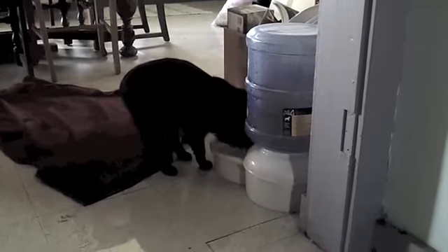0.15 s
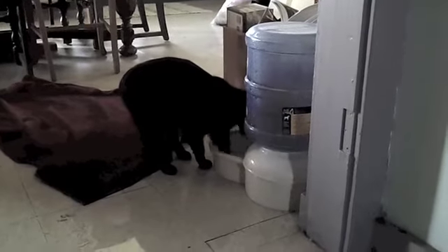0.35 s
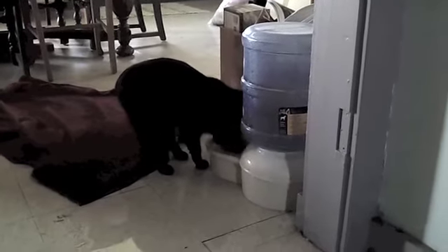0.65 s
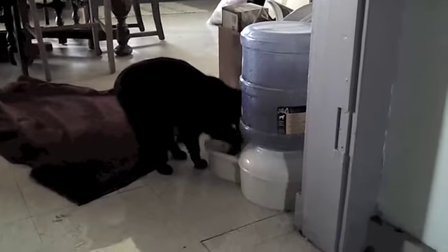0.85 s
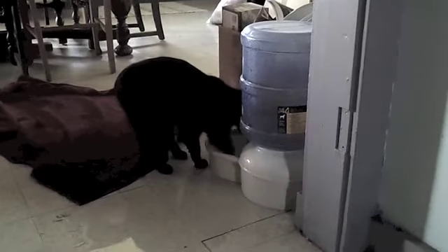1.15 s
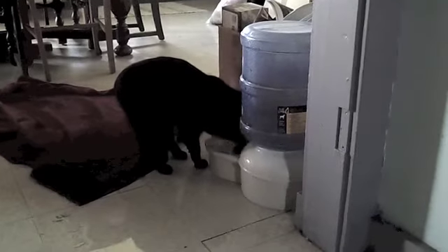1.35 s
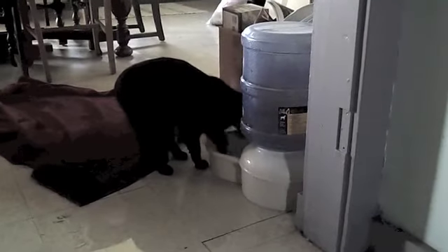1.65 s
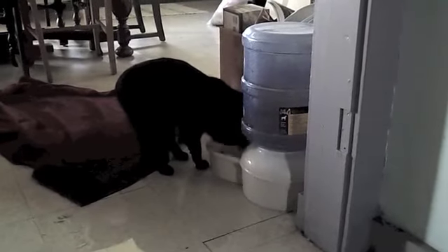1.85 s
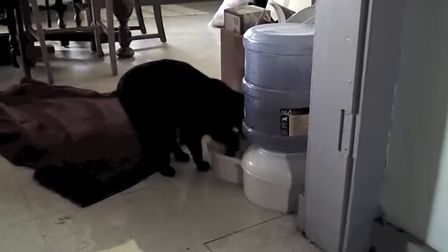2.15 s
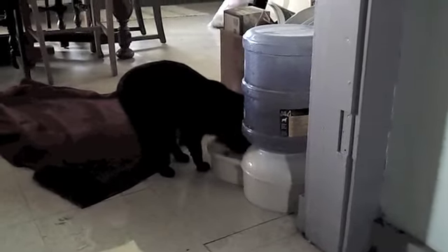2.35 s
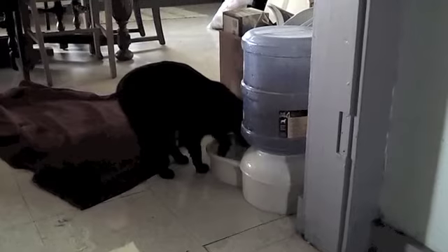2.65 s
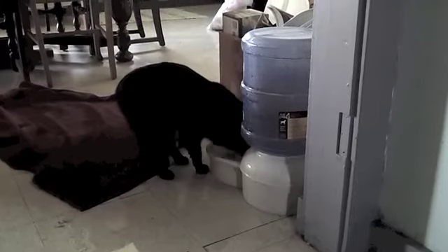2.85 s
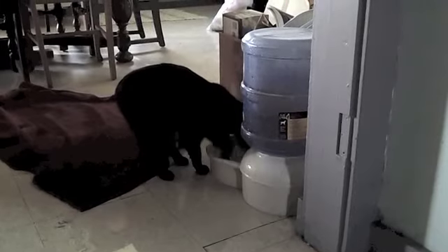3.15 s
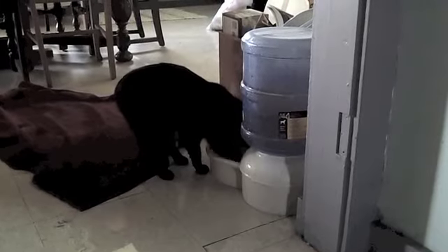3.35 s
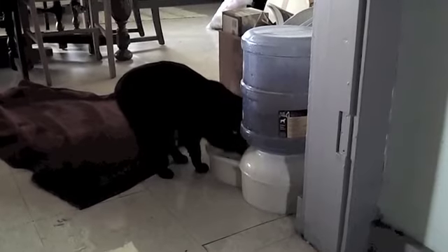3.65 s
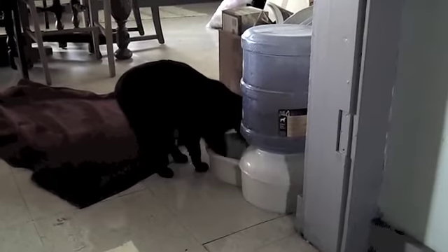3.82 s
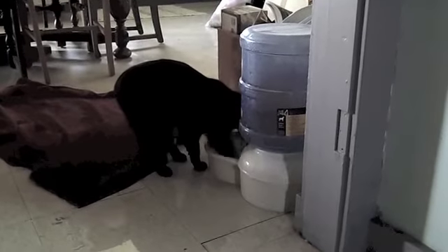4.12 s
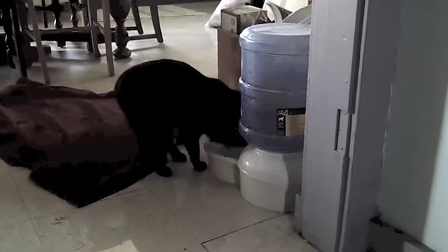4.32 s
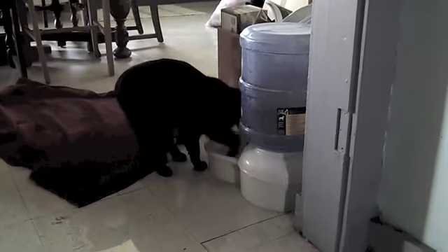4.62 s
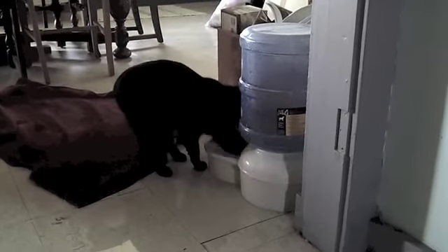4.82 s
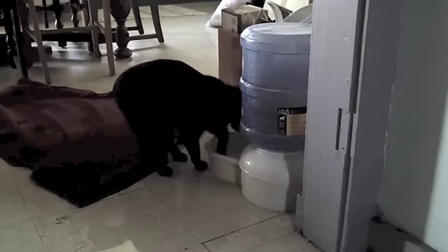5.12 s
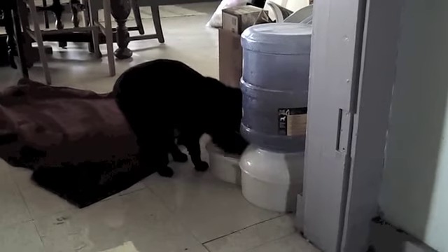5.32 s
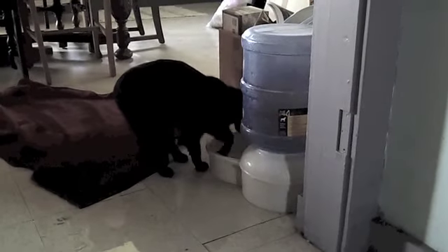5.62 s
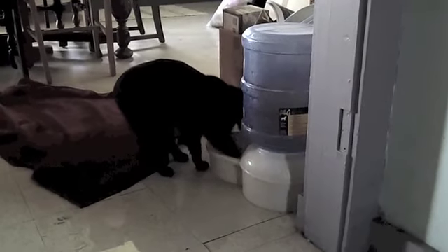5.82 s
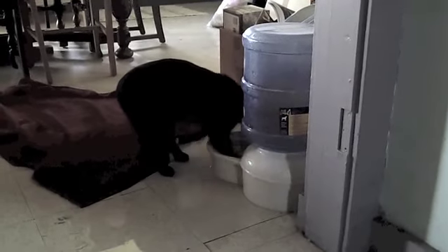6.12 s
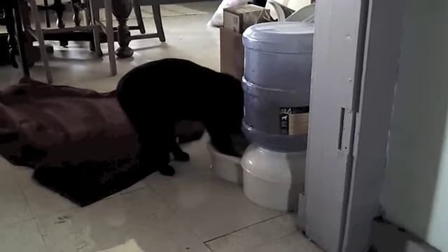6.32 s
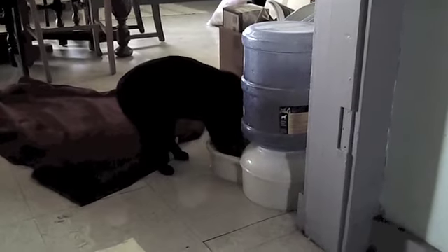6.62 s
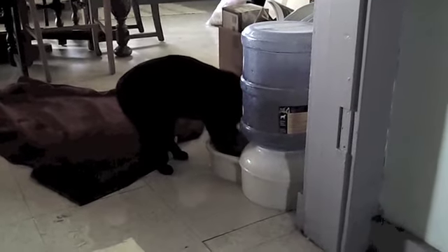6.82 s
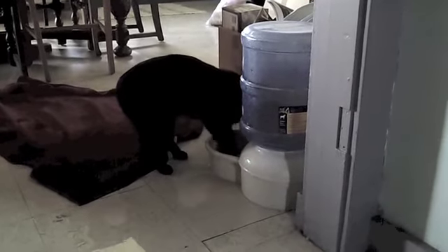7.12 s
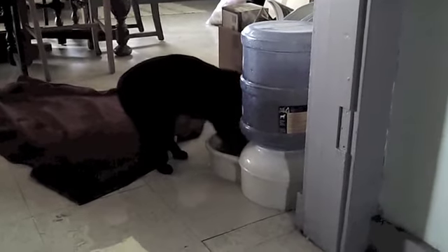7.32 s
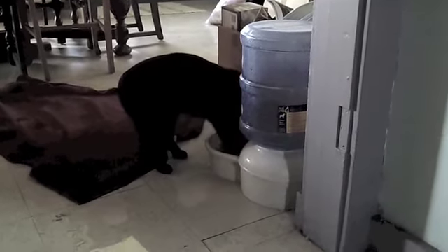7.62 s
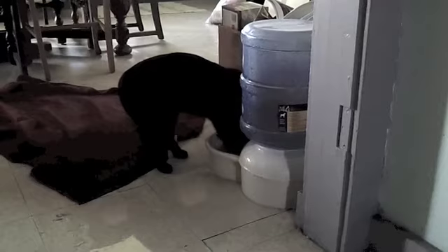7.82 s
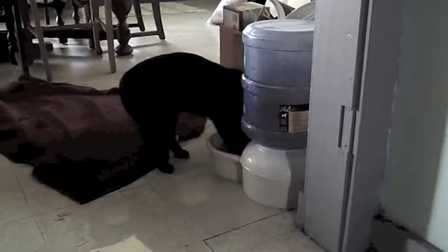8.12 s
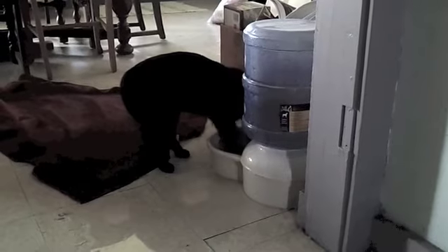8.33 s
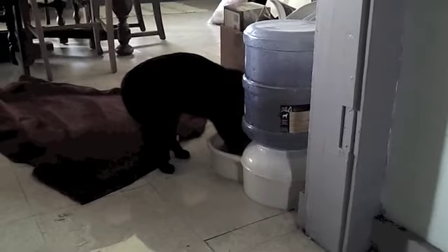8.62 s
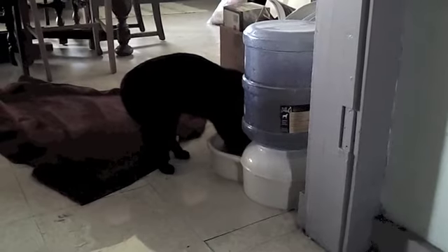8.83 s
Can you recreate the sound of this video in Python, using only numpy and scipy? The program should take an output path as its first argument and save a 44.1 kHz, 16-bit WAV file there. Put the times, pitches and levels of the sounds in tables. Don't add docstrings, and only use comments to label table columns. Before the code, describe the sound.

A cat's paw scoops water in a plastic bowl, with irregular plops, ticking drips and small splashes, then a short scrape across the kitchen floor.

```python
import sys
import numpy as np
from scipy import signal
from scipy.fft import rfft, irfft
from scipy.io import wavfile

SR = 44100
rng = np.random.default_rng(int(sys.argv[2]) if len(sys.argv) > 2 else 0)


def wrap_up_sound(samples):
    columns = np.atleast_2d(samples).T
    tamed = np.clip(columns, -1, 1)
    steps = np.round(tamed * 32767).astype(np.int16)
    wavfile.write(sys.argv[1], SR, steps)


def volts_from_db(level):
    exponent = np.asarray(level, float) / 20
    return 10 ** exponent


N = 395559


def in_time(spans):
    rows = []
    for span in spans:
        silent = [-110] * (len(span[0]) - 1)
        rows.append([span[0][0] - 0.02] + silent)
        rows.extend(span)
        rows.append([span[-1][0] + 0.02] + silent)
    rows = np.array(rows)
    return [np.interp(np.arange(N) / SR, rows[:, 0], column) for column in rows[:, 1:].T]


def rms_one(x):
    return x / np.sqrt(np.mean(x ** 2) + 1e-20)


def band(x, low_hz, high_hz):
    return signal.sosfilt(signal.butter(2, [low_hz, high_hz], "band", fs=SR, output="sos"), x)


def resonate(x, modes):
    out = 0
    for k, (hz, width_hz, db) in enumerate(modes):
        radius = np.exp(-np.pi * max(width_hz, 8) / SR)
        gain = (-1) ** k * volts_from_db(db) * (1 - radius ** 2) / 2
        poles = [1, -2 * radius * np.cos(2 * np.pi * hz / SR), radius ** 2]
        out = out + signal.lfilter([gain, 0, -gain], poles, x)
    return out


def add(out, start_s, sound):
    i = int(start_s * SR)
    out[i:i + len(sound)] += sound[:N - i]


def bubble(db, hz, t60_s, rise, attack_cycles):
    t = np.arange(int(t60_s * SR) + 64) / SR
    swell = 1 - np.exp(-t * hz / attack_cycles)
    cycles = hz * (t + rise * t * t / t60_s)
    return volts_from_db(db - 60 * t / t60_s) * swell * np.sin(2 * np.pi * cycles)


def camera():
    # (frequency [Hz], density [dB per Hz])
    hiss_curve = [(15, -42), (25, -22), (91, -3.5), (179, -2), (392, -5.5), (448, -6.5), (812, -13.5),
                  (954, -12.5), (1590, -16.5), (2260, -16.5), (2730, -28.5), (3880, -13), (4320, -41),
                  (6660, -20), (15800, -22.5)]
    t = np.arange(N) / SR
    bin_hz = np.arange(N // 2 + 1) * SR / N + 1
    curve_hz, curve_db = np.transpose(hiss_curve)
    colour = volts_from_db(np.interp(np.log(bin_hz), np.log(curve_hz), curve_db))
    hiss = volts_from_db(-61) * rms_one(irfft(rfft(rng.standard_normal(N)) * colour, N))

    throb_hz, whine_hz = 29.97, 15371.5
    cycle = t * throb_hz % 1
    gate = np.clip(cycle / 0.024, 0, 1) * volts_from_db(-14 * cycle)
    buzz = volts_from_db(-62.5) * gate * rms_one(band(rng.standard_normal(N), 2780, 4930))
    whine = volts_from_db(-77) * np.sin(2 * np.pi * whine_hz * t)
    return hiss + buzz + whine


def grains(per_s, low_hz, high_hz, cycles, spread_db):
    sizes = volts_from_db(spread_db * np.minimum(rng.exponential(1, N), 4)) * rng.choice([-1, 1], N)
    clicks = sizes * (rng.random(N) < per_s / SR)
    dealt = rng.integers(0, 16, N)
    out = np.zeros(N)
    for k, hz in enumerate(np.geomspace(low_hz, high_hz, 16)):
        out += resonate(clicks * (dealt == k) + 1e-18, [(hz, 2.1 * hz / cycles, 0)])
    return rms_one(out)


def wash():
    # (time [s], gurgle level [dB], spray level [dB])
    runoff = [
        [(0.0, -61, -60.5), (0.15, -49, -59.5), (0.23, -64, -62), (0.35, -57.5, -56), (0.5, -67.5, -64),
         (0.62, -50, -62), (0.74, -69.5, -57), (0.83, -56.5, -58), (1.18, -65, -68), (1.33, -66, -61),
         (1.45, -56, -56.5), (1.51, -61.5, -68), (1.82, -58.5, -57), (1.94, -57, -60.5), (2.07, -66, -55.5),
         (2.17, -58.5, -64), (2.29, -49, -64), (2.54, -70, -71), (2.63, -52, -72), (2.73, -50, -60),
         (2.83, -67, -70), (2.98, -64.5, -53.5), (3.17, -63, -73), (3.25, -56, -56), (3.42, -68, -71),
         (3.52, -51.5, -66), (3.69, -55.5, -63), (3.87, -61, -70), (4.01, -61, -62.5), (4.23, -82, -65.5),
         (4.28, -56, -58), (4.38, -64.5, -62), (4.92, -59, -61), (5.14, -57.5, -61.5), (5.22, -60.5, -68),
         (5.34, -62.5, -74), (5.58, -59, -62.5), (5.97, -73, -65.5), (6.05, -80, -70)],
        [(6.55, -71, -72), (6.658, -60.5, -64), (6.9, -83, -68)],
        [(7.4, -74, -70), (7.8, -74, -70), (7.924, -55, -62), (8.046, -68, -67), (8.09, -52, -68),
         (8.378, -64.5, -59), (8.522, -54.5, -54.5), (8.722, -61, -71), (8.854, -61, -57.5), (8.97, -82, -75)],
    ]
    gurgle_db, spray_db = in_time(runoff)
    gurgle = volts_from_db(gurgle_db - 0.5) * grains(500, 635, 2294, 13, 4.7)
    spray = volts_from_db(spray_db - 4.5) * grains(2700, 2270, 5720, 16, 6.2)
    return gurgle + spray


def droplets():
    # (time [s], peak level [dB], pitch [Hz])
    drops = [(0.0244, -43.5, 2960), (0.1176, -44, 2700), (0.1755, -41, 3320), (0.246, -49, 3160),
             (0.3251, -32.5, 3640), (0.403, -46, 3040), (0.5209, -40, 4230), (0.5395, -30, 2370),
             (0.6555, -47, 2900), (0.741, -46, 4290), (0.7565, -42, 3280), (0.858, -34, 3080),
             (1.25, -46.5, 2840), (1.3577, -41.5, 2800), (1.5529, -34, 5130), (1.6202, -44.5, 3030),
             (1.6577, -47, 3200), (1.803, -40.5, 2940), (1.96, -44.5, 3030), (2.0133, -46, 2470),
             (2.0471, -46.5, 2360), (2.183, -45, 2890), (2.21, -38.5, 3230), (2.2633, -44, 3450),
             (2.293, -36, 3000), (2.59, -44, 2480), (2.7095, -39, 3000), (2.7806, -38.5, 2440),
             (2.9202, -39, 4460), (2.9558, -38, 2540), (3.2008, -44.5, 3060), (3.2869, -48, 2480),
             (3.5728, -46, 2680), (3.6163, -32, 2970), (3.7933, -53, 5200), (3.8178, -48.5, 3100),
             (3.8696, -38.5, 4880), (3.989, -40, 4030), (4.1587, -40, 4060), (4.1788, -32, 2930),
             (4.2567, -42.5, 3340), (4.4263, -46, 4670), (4.589, -45, 3250), (4.6008, -40, 3300),
             (4.6376, -44.5, 3140), (4.705, -44, 2680), (4.9464, -47, 2900), (5.009, -46, 3130),
             (5.118, -43, 2860), (5.2583, -41.5, 3160), (5.4284, -37, 3870), (5.5694, -47, 2800),
             (5.857, -46.5, 3230), (5.898, -45.5, 3070), (6.6253, -57, 3400), (6.6388, -48, 2960),
             (7.4807, -51.5, 3800), (7.866, -44, 4050), (7.899, -52, 2950), (7.9139, -44.5, 2650),
             (7.9745, -47, 2970), (8.012, -50, 2930), (8.142, -43, 4430), (8.2646, -57, 3120),
             (8.272, -46, 2900), (8.329, -38.5, 3180), (8.3709, -43, 2610), (8.3908, -33.5, 2710),
             (8.4981, -32.5, 3320), (8.7475, -44, 4670)]
    out = np.zeros(N)
    for start_s, db, hz in drops:
        add(out, start_s, bubble(db + 4, hz, 54.0 / hz, rise=0.3, attack_cycles=0.24))
    return out


def plops():
    # (time [s], peak level [dB], pitch [Hz], ring t60 [s])
    pockets = [(0.026, -44.5, 1410, 0.041), (0.06, -43.5, 1830, 0.026), (0.115, -31.5, 1430, 0.019),
               (0.283, -34, 1240, 0.033), (0.323, -32.5, 1420, 0.022), (0.346, -30.5, 1310, 0.027),
               (0.395, -41, 1700, 0.026), (0.524, -35, 1580, 0.019), (0.541, -16, 1430, 0.02),
               (0.737, -42, 1320, 0.023), (0.761, -37, 1920, 0.02), (0.782, -43, 817, 0.026),
               (0.858, -47, 2100, 0.03), (0.888, -43, 2180, 0.04), (0.942, -37, 820, 0.034),
               (0.972, -39, 914, 0.025), (1.007, -38.5, 1280, 0.024), (1.25, -44, 1420, 0.026),
               (1.288, -39.5, 1350, 0.024), (1.356, -38.5, 1840, 0.015), (1.388, -38, 1305, 0.018),
               (1.553, -36, 1090, 0.023), (1.658, -55.5, 2120, 0.03), (1.722, -47.5, 1300, 0.024),
               (1.793, -16, 1070, 0.016), (1.839, -32, 906, 0.028), (1.968, -45, 560, 0.027),
               (1.985, -31, 582, 0.06), (2.047, -27.5, 1410, 0.024), (2.171, -57, 1470, 0.03),
               (2.263, -29.5, 1804, 0.033), (2.382, -44, 821, 0.03), (2.425, -37.5, 680, 0.028),
               (2.477, -43, 641, 0.024), (2.518, -31.5, 1020, 0.03), (2.713, -26.5, 1100, 0.018),
               (2.749, -35.5, 1850, 0.027), (2.908, -42.5, 1280, 0.04), (2.945, -17, 1890, 0.015),
               (3.17, -44.5, 1280, 0.03), (3.287, -40, 2180, 0.03), (3.303, -29.5, 1373, 0.019),
               (3.398, -41.5, 640, 0.043), (3.424, -27.5, 1005, 0.019), (3.61, -31, 1206, 0.02),
               (3.739, -33.5, 796, 0.022), (3.839, -26, 1135, 0.021), (3.952, -42.5, 1210, 0.021),
               (3.989, -36.5, 1270, 0.032), (4.176, -24, 1228, 0.018), (4.279, -37.5, 1820, 0.023),
               (4.374, -44, 1590, 0.03), (4.426, -42, 1800, 0.017), (4.482, -40.5, 1930, 0.015),
               (4.551, -40, 1645, 0.034), (4.584, -24, 570, 0.039), (4.684, -35, 1290, 0.03),
               (4.708, -24, 1380, 0.022), (4.824, -50, 1340, 0.03), (4.909, -42, 1320, 0.025),
               (4.943, -43, 1190, 0.035), (4.961, -33, 1250, 0.036), (5.011, -25.5, 1696, 0.023),
               (5.119, -29, 1990, 0.02), (5.427, -38.5, 2080, 0.022), (5.554, -41.5, 1325, 0.025),
               (5.699, -34, 1660, 0.024), (5.898, -43.5, 1400, 0.024), (6.625, -50, 2080, 0.03),
               (6.64, -43.5, 1490, 0.022), (6.692, -41, 1660, 0.024), (6.745, -40.5, 562, 0.038),
               (6.777, -41, 945, 0.034), (7.918, -30.5, 1333, 0.019), (7.98, -43, 982, 0.026),
               (7.994, -27, 1086, 0.036), (8.029, -37, 678, 0.03), (8.127, -39, 670, 0.024),
               (8.142, -21.5, 1210, 0.017), (8.369, -40, 1240, 0.038), (8.452, -42.5, 780, 0.026),
               (8.486, -32, 799, 0.02), (8.516, -26.5, 1310, 0.023), (8.547, -26, 616, 0.015),
               (8.606, -40, 640, 0.026)]
    out = np.zeros(N)
    for start_s, db, hz, t60_s in pockets:
        add(out, start_s, bubble(db + 1, hz, max(t60_s, 0.005), rise=0.12, attack_cycles=0.28))
    return out


def slaps():
    # (time [s], peak level [dB])
    hits = [(0.3232, -46.5), (0.5217, -48.5), (0.902, -46.5), (1.4436, -51.5), (1.5524, -45.5),
            (1.8083, -49), (2.9568, -35), (3.293, -54), (3.6117, -39.5), (3.8701, -54), (4.179, -47.5),
            (4.6014, -42), (4.95, -45.5), (5.424, -41.5), (8.2756, -41), (8.4961, -51)]
    out = np.zeros(N)
    t = np.arange(2000) / SR
    tick_t60_s, spray_t60_s = 0.0046, 0.085
    fade = volts_from_db(-60 * t / tick_t60_s) + volts_from_db(-12.5 - 60 * t / spray_t60_s)
    for start_s, db in hits:
        add(out, start_s, volts_from_db(db + 0.5) * rng.standard_normal(2000) * fade)
    return band(out, 2500, 9800)


def thumps():
    # (time [s], peak level [dB], pitch [Hz])
    pushes = [(0.539, -41, 185), (0.648, -52, 166), (0.733, -50, 153), (0.784, -48, 156),
              (1.389, -51.5, 247), (1.557, -54, 240), (1.794, -38.5, 313), (1.839, -45.5, 357),
              (1.986, -50, 186), (2.048, -55, 217), (2.713, -49.5, 237), (2.941, -50.5, 266),
              (3.306, -44, 228), (3.614, -46.5, 235), (3.843, -51, 163), (4.182, -46.5, 244),
              (4.584, -58.5, 183), (4.636, -53, 388), (4.758, -48, 212), (6.745, -53.5, 229),
              (8.139, -45, 307), (8.453, -47, 284)]
    out = np.zeros(N)
    for start_s, db, hz in pushes:
        add(out, start_s, bubble(db + 2, hz, t60_s=0.055, rise=0.0, attack_cycles=0.5))
    return out


def scrape(modes, slips_per_s):
    slips = rng.standard_normal(N) * (rng.random(N) < slips_per_s / SR)
    return rms_one(resonate(slips, modes))


def paw_rubs():
    # (time [s], level [dB])
    strokes = [
        [(2.42, -64), (2.428, -53), (2.47, -52), (2.53, -33), (2.566, -32.5), (2.622, -53), (2.7, -58.5)],
        [(3.38, -61), (3.402, -53), (3.448, -36.5), (3.478, -32), (3.528, -51), (3.536, -43), (3.6, -62)],
        [(7.94, -43), (7.972, -49), (7.998, -34), (8.022, -31), (8.032, -33), (8.12, -55)],
    ]
    # (frequency [Hz], width [Hz], level [dB])
    bowl_modes = [(678, 32, 2), (854, 11, -10.5), (1014, 55, -1), (1970, 290, -14), (2430, 16, -13.5),
                  (2950, 74, -21.5)]
    rub_db, = in_time(strokes)
    return volts_from_db(rub_db - 5) * scrape(bowl_modes, 1500)


def bowl_drag():
    # (time [s], base level [dB], wall level [dB])
    drag = [(8.43, -78, -56), (8.522, -42, -46), (8.562, -49, -49), (8.586, -53, -44), (8.612, -37, -41),
            (8.734, -45, -54), (8.764, -50, -48), (8.798, -61, -74), (8.872, -56, -46.5), (8.928, -88, -76),
            (8.97, -75, -73)]
    # (frequency [Hz], width [Hz], level [dB])
    base_modes = [(213, 58, 0)]
    wall_modes = [(641, 88, -5.5), (817, 19, 0), (947, 9.9, -5.5)]
    base_db, wall_db = in_time([drag])
    base = volts_from_db(base_db - 5.0) * scrape(base_modes, 600)
    wall = volts_from_db(wall_db - 7.5) * scrape(wall_modes, 900)
    return base + wall


def room(x):
    t60_s, tail_db = 0.22, -12
    t = np.arange(int(0.5 * SR)) / SR
    tail = rng.standard_normal(len(t)) * np.clip((t - 0.003) / 0.0083, 0, 1)
    low = band(tail, 160, 3200) * volts_from_db(-60 * t / t60_s)
    high = band(tail, 2030, 8400) * volts_from_db(-60 * t / (0.46 * t60_s))
    answer = low + 0.66 * high
    answer = volts_from_db(tail_db) * answer / np.sqrt(np.sum(answer ** 2))
    for delay_s, db in [(0.0045, -8.5), (0.011, -7.5), (0.017, -8.5)]:
        answer[int(delay_s * SR)] += volts_from_db(db)
    return signal.fftconvolve(x, answer)[:N]


def scene():
    near = wash() + droplets() + plops() + slaps() + thumps() + paw_rubs() + bowl_drag()
    return (near + room(near) + camera())[None]


def top_cut(x):
    return signal.sosfilt(signal.butter(12, 15930, fs=SR, output="sos"), x)


def record(dry):
    notched = signal.lfilter(*signal.iirnotch(7660, 22, fs=SR), dry)
    return top_cut(notched)


dry = scene()
out = record(dry)
wrap_up_sound(out)
```